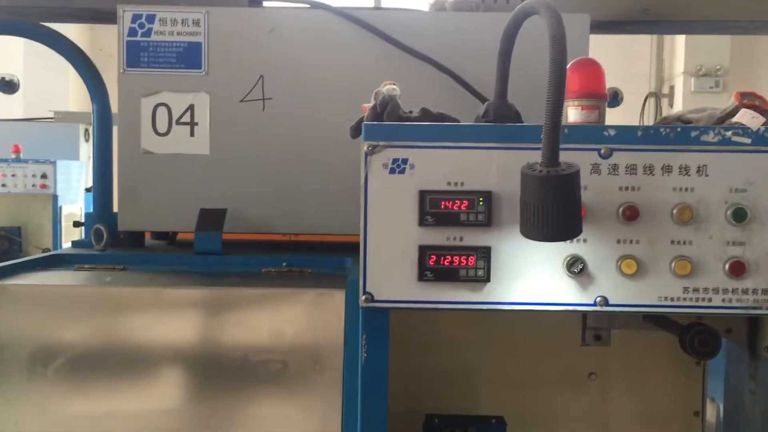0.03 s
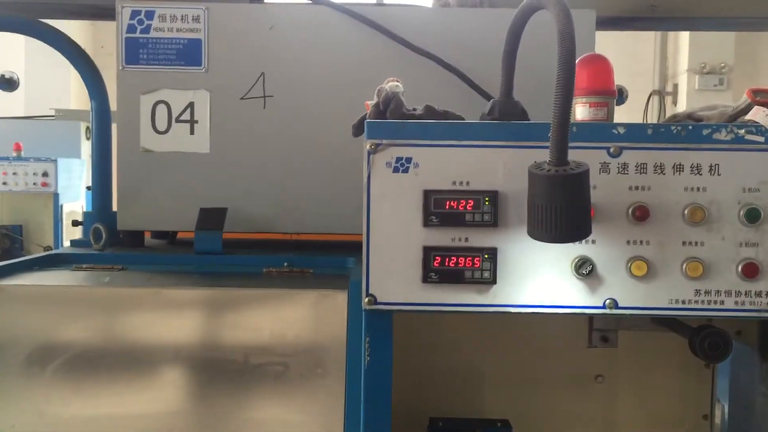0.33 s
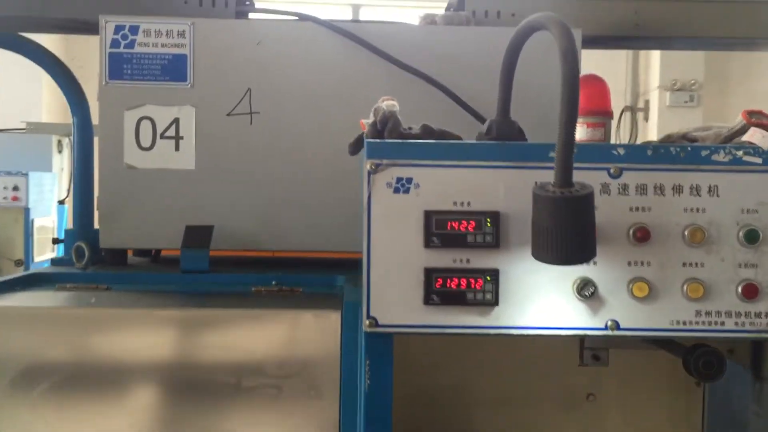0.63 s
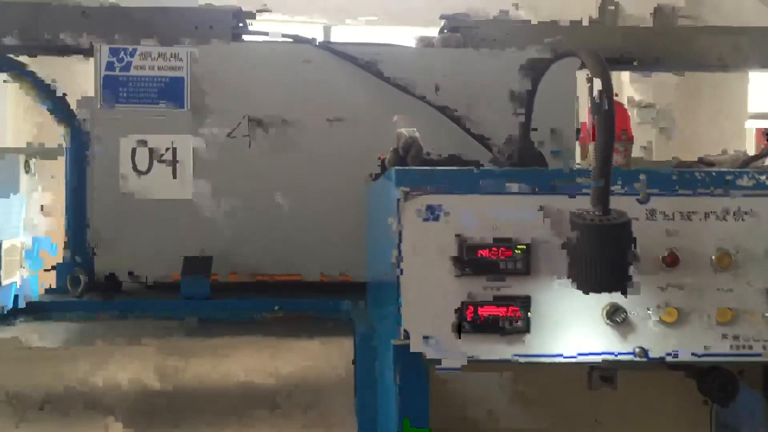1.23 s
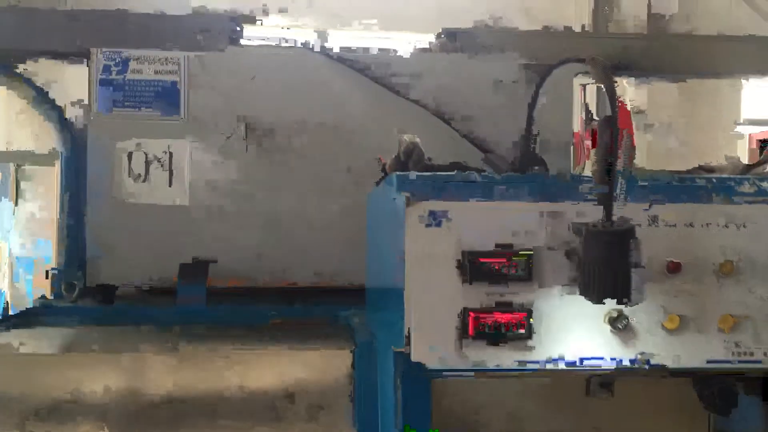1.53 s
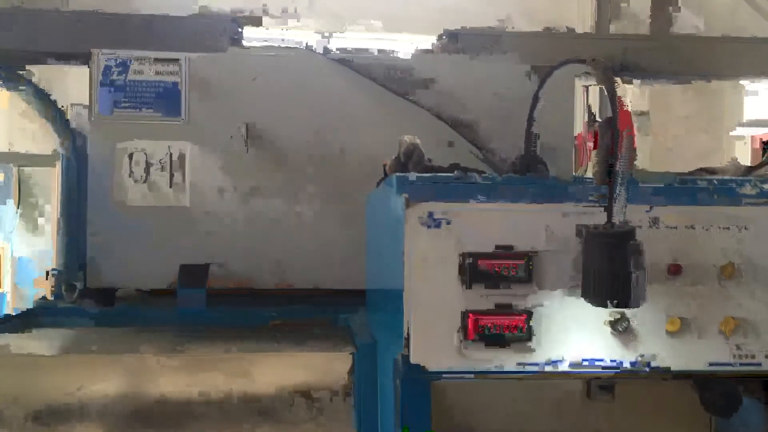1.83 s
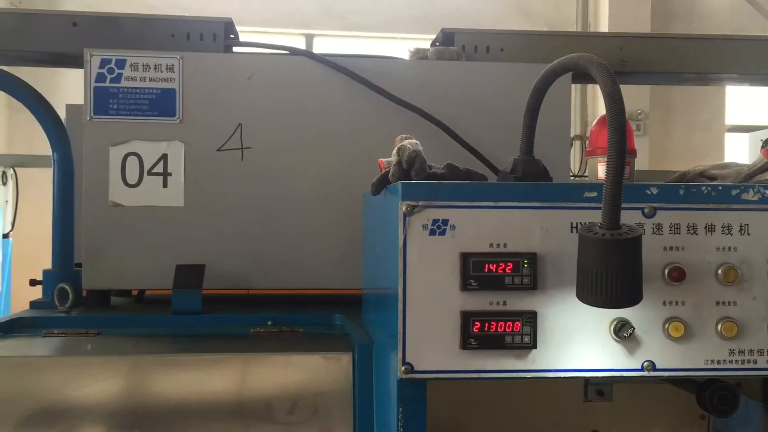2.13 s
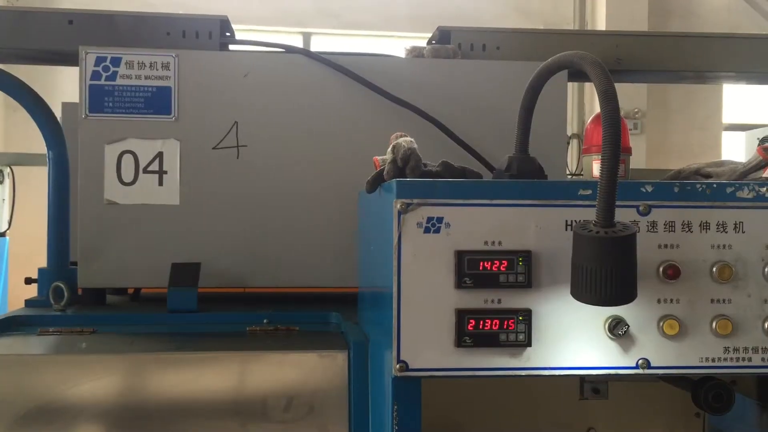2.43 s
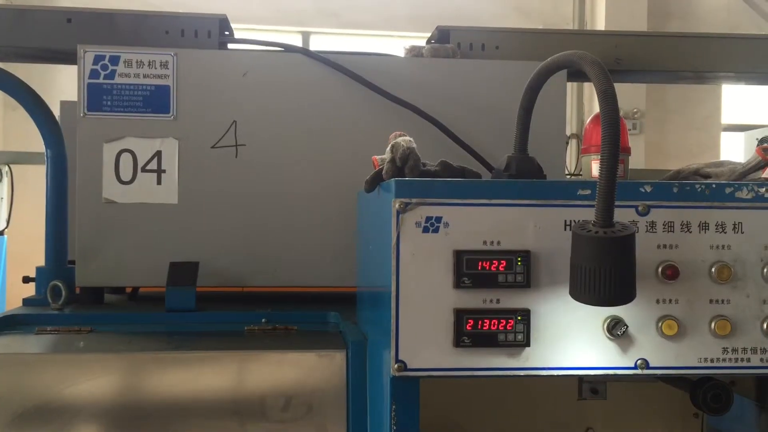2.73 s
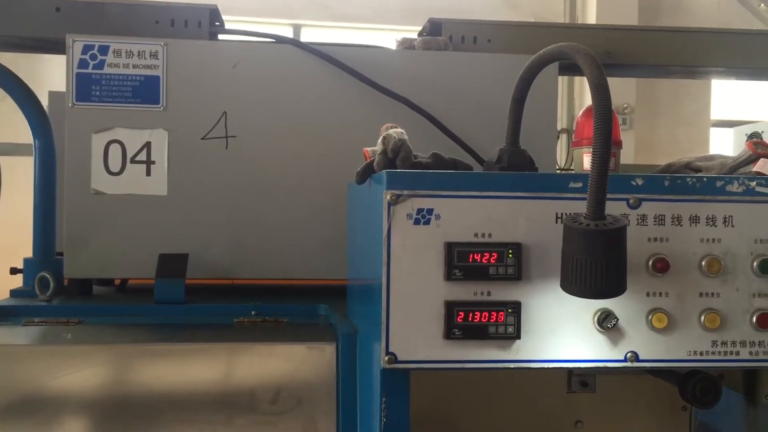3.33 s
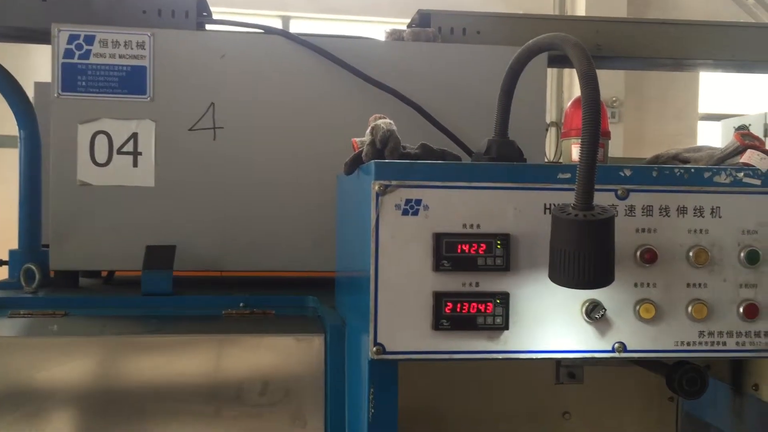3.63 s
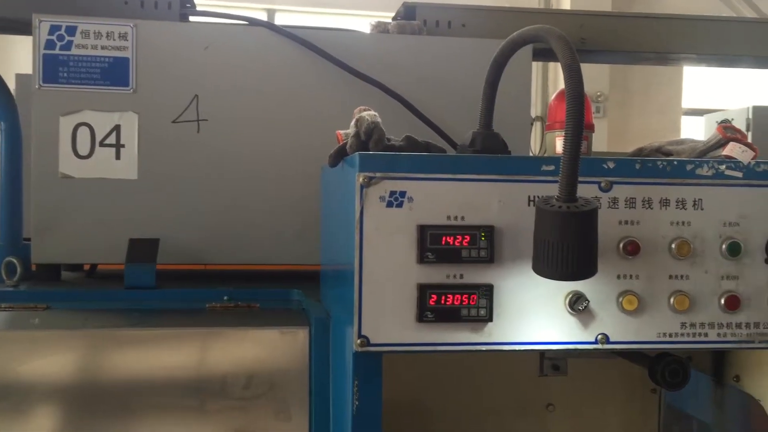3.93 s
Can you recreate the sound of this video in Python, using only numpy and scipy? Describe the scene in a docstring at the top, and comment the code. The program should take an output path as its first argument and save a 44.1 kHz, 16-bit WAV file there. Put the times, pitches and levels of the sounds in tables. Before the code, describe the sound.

Heard from just in front, an industrial machine roars in a factory hall. Its motor and gears hum while a thin whine wavers on top. Everything drops to silence briefly, then the same noise carries on.

```python
"""Wire drawing machine, flat out

Heard in a factory hall, just in front of the panel. Capstans, belts and coolant spray make a dense
roar with an uneven throb in the bass. The drive hums inside it at steady pitches, and the take-up
spindle whines faintly on top, rising and sagging with its speed. The sound cuts out for half a second."""
import sys
import numpy as np
from scipy import signal
from scipy.fft import rfft, irfft
from scipy.io import wavfile
from scipy.ndimage import uniform_filter1d

SR = 44100
rng = np.random.default_rng(int(sys.argv[2]) if len(sys.argv) > 2 else 0)


def store_wav(level_fs):
    """Save 16-bit WAV to argv[1]."""
    pcm = np.round(np.clip(np.atleast_2d(level_fs), -1, 1) * 32767)
    wavfile.write(sys.argv[1], SR, pcm.T.astype(np.int16))


N = 176400

# spindle speed, as the pitch of its main whine: t/s, f/Hz
SPINDLE_SPEED = [(0, 9797), (.25, 9815), (.55, 9843), (.8, 9885), (.9, 9935), (.98, 9957), (1.1, 9915),
                 (1.2, 9875), (1.35, 9842), (1.9, 9828), (2.3, 9800), (2.58, 9820), (3.08, 9805),
                 (3.45, 9783), (3.7, 9795), (3.85, 9780), (4, 9795)]
NOMINAL_HZ = 9800  # that pitch at nominal speed
# spindle whines at nominal speed: f/Hz, line width/Hz, unsteady share/0-1, [(t/s, level/dB)]
SPINDLE_WHINES = [ (2367, 16, .15, [(0, -36.5), (.7, -37), (1.3, -42), (2.0, -51), (3.1, -55), (3.7, -44),
                  (4, -47)]), (4540, 60, .8, [(0, -60), (.45, -58), (.7, -40), (1.35, -42), (1.8, -56),
                  (3.1, -53), (3.55, -45), (4, -55)]), (9400, 20, .2, [(0, -63), (.6, -59), (.9, -51),
                  (1.4, -64), (3.1, -61), (3.35, -51), (4, -60)]), (9800, 16, .06, [(0, -47), (.35, -54),
                  (.55, -45), (.75, -52), (.87, -44), (1.0, -40), (1.3, -60), (1.5, -51), (1.75, -56),
                  (2.0, -42.5), (2.55, -44.5), (3.5, -53), (3.9, -45)]), (9912, 16, .1, [(0, -62),
                  (1.2, -54), (1.4, -43.5), (2.0, -56), (4, -58)]), (10020, 16, .08, [(0, -49), (.45, -45),
                  (.7, -61), (.95, -58), (1.1, -45), (1.45, -41), (2.3, -53), (3.3, -45.5), (4, -50)]),
                  (10108, 24, .3, [(0, -48.5), (.4, -47.5), (.8, -66), (1.4, -62), (1.8, -55), (3.3, -52),
                  (4, -56)])]
# hum of motor, belts and gears: f/Hz, level/dB, line width/Hz, unsteady share/0-1
DRIVE_TONES = [(64.0, -41, 2, .05), (172.7, -45, 6, .6), (184.2, -41, 5, .4), (300.6, -37.3, 7, .3),
               (915.8, -45.5, 4, .3), (961.0, -52, 4, .4), (1236.3, -48, 3, .3), (1504.8, -46, 10, .7),
               (2163.4, -51, 8, .6), (2588.6, -51, 14, .9), (3498.1, -50.5, 5, .4), (3861.4, -50, 20, .9),
               (5170, -48, 12, .6), (5774.3, -52, 20, .9), (8804.4, -55, 40, .9), (10993.8, -60, 10, .5),
               (12001.2, -65, 8, .5)]
# two strong gear tones that swell and fade: f/Hz, line width/Hz, unsteady share/0-1, [(t/s, level/dB)]
GEAR_TONES = [ (551.9, 3, .06, [(0, -46), (.9, -41), (1.15, -36), (1.5, -34), (1.75, -41), (2.05, -36.5),
              (2.5, -40), (3.2, -41), (4, -35.5)]), (735.9, 8, .25, [(0, -40), (.22, -35), (.6, -45),
              (.85, -43), (.95, -33.5), (1.2, -38), (1.6, -37.5), (1.8, -44), (1.93, -35), (2.55, -37),
              (3.1, -42), (4, -39)])]
# uneven bass throb, as boost or cut at the centre of its band: t/s, level/dB
BASS_THROB = [(0, 0), (.28, 0), (.55, -0.5), (.74, 5.5), (.86, -4), (1.05, 2.5), (1.13, -2), (1.3, 3),
              (1.55, -3), (1.74, 4.5), (1.9, 0.5), (2.22, 0), (2.36, -1.5), (2.5, 1.2), (3.35, 0.9),
              (3.6, -4), (3.75, 3.7), (4, -2.5)]
THROB_HZ, THROB_WIDTH_HZ = 260, 92
# tone colour of capstans, belts and spray through the housing: f/Hz, relative level/dB
ROAR_SPECTRUM = [(20, -85.5), (40, -72.5), (55, -66), (80, -57.5), (115, -56.5), (175, -51.5), (215, -55.5),
                 (240, -52), (265, -54.5), (305, -51.5), (350, -53), (410, -60), (560, -57), (640, -56),
                 (730, -55), (800, -59), (1100, -58.5), (1420, -59.5), (1600, -60), (1780, -56.5),
                 (1950, -57.5), (2120, -60.5), (2400, -60.5), (2520, -63.5), (2850, -64), (3700, -66),
                 (4400, -64), (4850, -65.3), (5800, -65), (6600, -67), (7400, -68.5), (7700, -70.5),
                 (8700, -70), (9600, -72.5), (10150, -73), (10350, -77.5), (10600, -77.3), (11200, -76),
                 (13000, -77), (15200, -77.5)]
ROAR_DB, FLICKER_DB, FLUTTER_DB = -21.5, 0.84, 0.55
RIPPLE_DB, RIPPLE_STEP_HZ, RIPPLE_CORNER_HZ = 1.1, 16, 360  # comb of the hall's reflections


def gain_of(db):
    """Decibels to gain."""
    return 10 ** (np.asarray(db) / 20)


def unit_rms(x):
    """Scales to rms 1."""
    return x / np.sqrt(np.mean(abs(x) ** 2) + 1e-20)


def curve(points):
    """Draws an automation curve through the points, one value a sample."""
    return np.interp(np.arange(N) / SR, *np.transpose(points))


def drift(rate_hz):
    """Smooth random motion of rms 1 up to about the given rate."""
    hz = np.fft.rfftfreq(N, 1 / SR)
    low_pass = np.exp(-(hz / rate_hz) ** 2 / 2) * (hz > 0)
    return unit_rms(irfft(rfft(rng.standard_normal(N)) * low_pass, N))


def tone(hz, width_hz, unsteady):
    """A tone of rms 1, part clean and part wavering in level and phase."""
    waver = drift(width_hz / 2) + 1j * drift(width_hz / 2)
    envelope = np.sqrt(1 - unsteady) + np.sqrt(unsteady / 2) * waver
    turns = np.cumsum(hz * np.ones(N)) / SR + rng.random()
    return unit_rms((envelope * np.exp(2j * np.pi * turns)).real)


def patches(shape, frames, bins):
    """A smooth random texture of rms 1 over frequency and time."""
    field = uniform_filter1d(rng.standard_normal(shape), bins, axis=0)
    return unit_rms(uniform_filter1d(field, frames, axis=1))


def throb_share(hz):
    """How strongly a frequency rides the bass throb, 0-1."""
    return np.exp(-((hz - THROB_HZ) / THROB_WIDTH_HZ) ** 2 / 2)


def spindle():
    """Thin whines and a rough squeal swell and fade, all bending in pitch with the spindle's speed."""
    speed = curve(SPINDLE_SPEED) / NOMINAL_HZ
    return sum(gain_of(curve(level)) * tone(hz * speed, width, unsteady)
               for hz, width, unsteady, level in SPINDLE_WHINES)


def drive():
    """Motor, belts and gears hum at constant speed; the low tones ride the throb."""
    throb_db = curve(BASS_THROB)
    hum = sum(gain_of(db + throb_share(hz) * throb_db) * tone(hz, width, unsteady)
              for hz, db, width, unsteady in DRIVE_TONES)
    gears = sum(gain_of(curve(level)) * tone(hz, width, unsteady)
                for hz, width, unsteady, level in GEAR_TONES)
    return hum + gears


def hall_ripple(hz):
    """The hall's reflections comb the spectrum: random peaks and dips in dB, shallower in the bass."""
    knots_hz = np.arange(SR // 2) * RIPPLE_STEP_HZ
    ripple = np.interp(hz, knots_hz, rng.standard_normal(len(knots_hz)))
    return RIPPLE_DB * ripple * hz / (hz + RIPPLE_CORNER_HZ)


def roar():
    """Capstans, belts and spray blend into a wall of noise that flickers and throbs in the bass."""
    hz = np.fft.rfftfreq(N, 1 / SR)
    points_hz, points_db = np.transpose(ROAR_SPECTRUM)
    colour_db = np.interp(np.log(hz + 1), np.log(points_hz + 1), points_db)
    steady = irfft(rfft(rng.standard_normal(N)) * gain_of(colour_db + hall_ripple(hz)), N)
    framing = dict(nperseg=1024, noverlap=768)
    band_hz, t, bands = signal.stft(steady, SR, **framing)
    throb_db = throb_share(band_hz)[:, None] * np.interp(t, *np.transpose(BASS_THROB))
    flicker_db = FLICKER_DB * patches(bands.shape, frames=24, bins=14)
    moving = signal.istft(bands * gain_of(throb_db + flicker_db), SR, **framing)[1][:N]
    flutter = gain_of(FLUTTER_DB * drift(rate_hz=120))
    return gain_of(ROAR_DB) * unit_rms(moving * flutter)


def scene():
    """The machine sits dead centre, alike in both ears."""
    return np.tile(spindle() + drive() + roar(), (2, 1))


def record(dry, mute_from_s=2.585, mute_to_s=3.0725, cutoff_hz=15330):
    """A hard mute cuts the sound briefly; a steep low-pass trims the very top."""
    t = np.arange(N) / SR
    gate = (t < mute_from_s) | (t > mute_to_s)
    low_pass = signal.firwin(1023, cutoff_hz, window=("kaiser", 9), fs=SR)
    return signal.oaconvolve(dry * gate, low_pass[None], "same")


dry = scene()
out = record(dry)
store_wav(out)
```